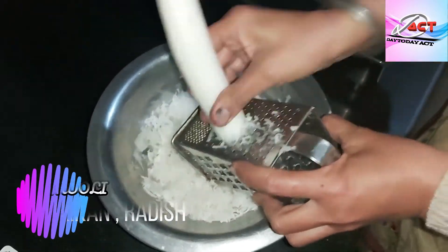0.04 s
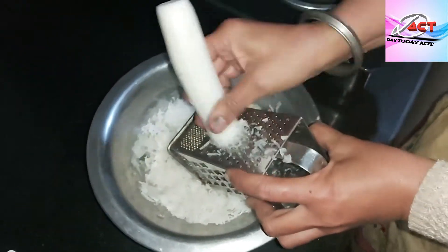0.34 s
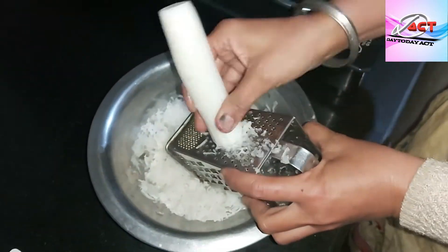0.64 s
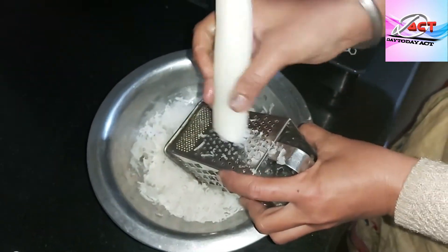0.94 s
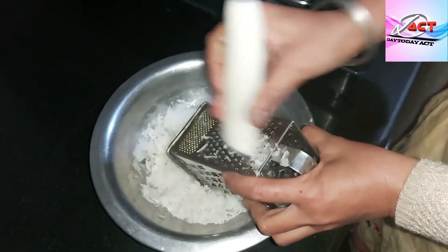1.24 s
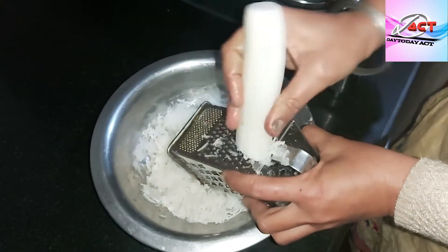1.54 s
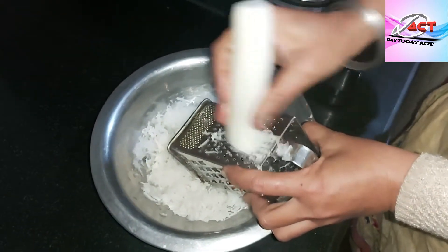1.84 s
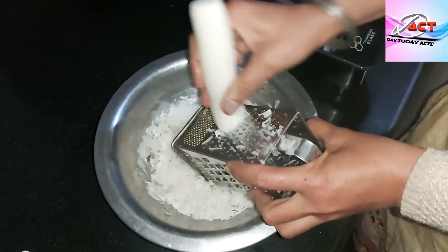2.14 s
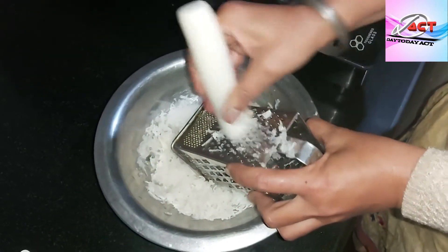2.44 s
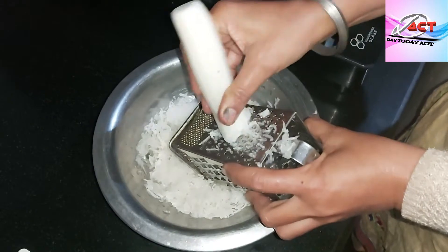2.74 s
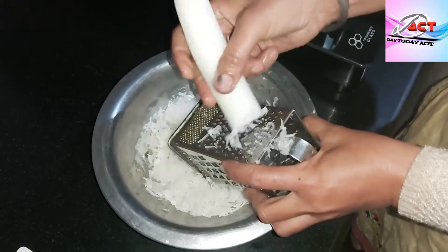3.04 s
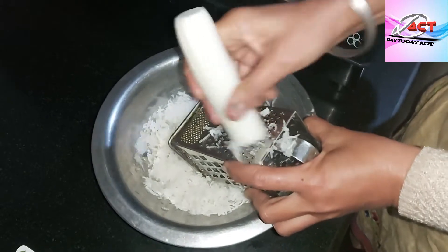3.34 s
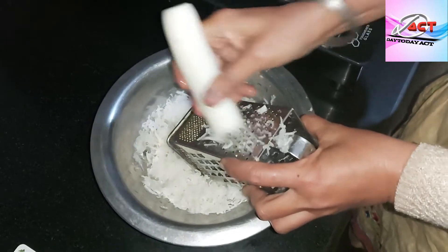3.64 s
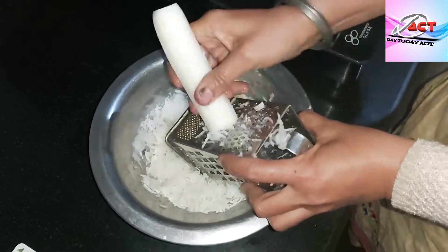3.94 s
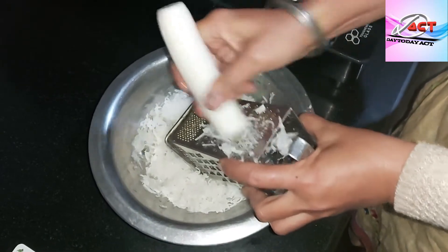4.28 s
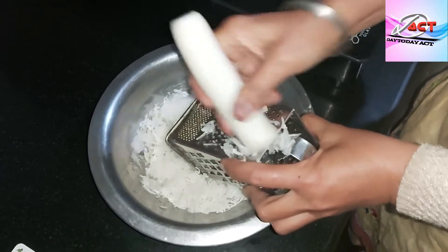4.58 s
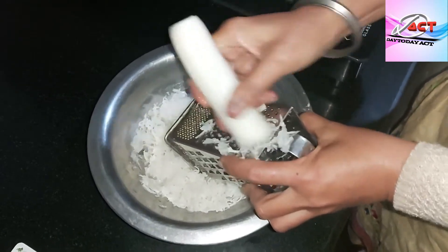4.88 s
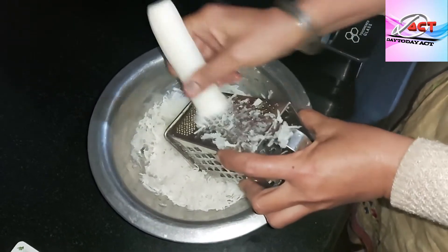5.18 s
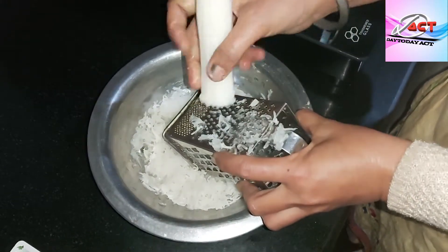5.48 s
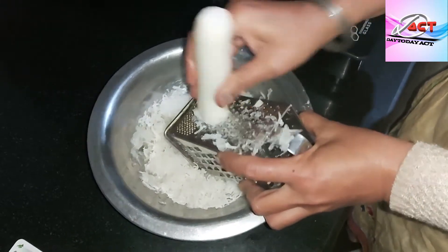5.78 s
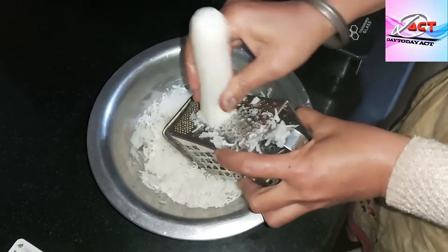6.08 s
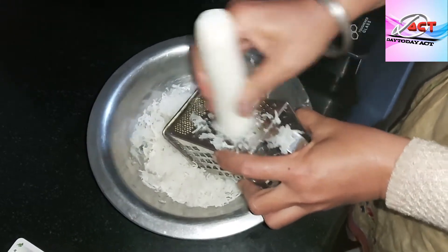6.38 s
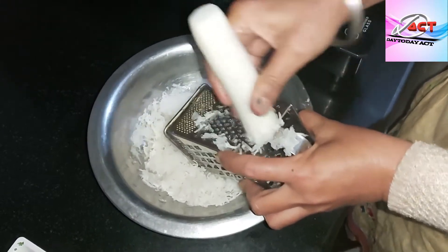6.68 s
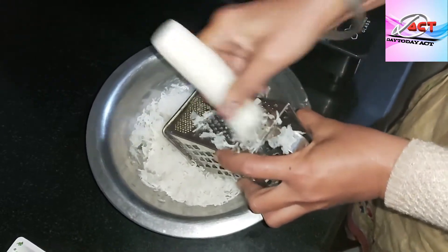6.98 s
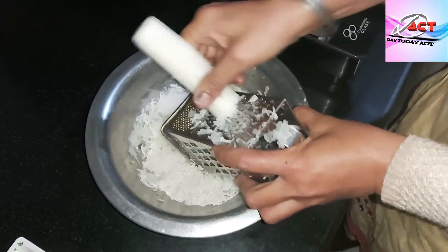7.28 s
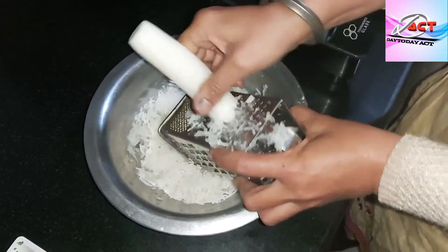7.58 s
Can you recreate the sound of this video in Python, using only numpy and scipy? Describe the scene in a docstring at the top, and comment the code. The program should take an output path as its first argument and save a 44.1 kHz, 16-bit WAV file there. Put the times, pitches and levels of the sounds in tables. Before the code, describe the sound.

A radish is grated on a steel box grater in a steel bowl, heard close in a small, hard-walled kitchen. Each push is a short, wet, hissing rasp with a crisp snap and a thin metallic ring, about four a second, with softer return scrapes between. The first run lasts until about 0.6 seconds. After a pause, the second starts softly at 1.1 seconds and builds until 2.7. A third runs from 3.4 to 5.2 seconds, and the last begins gently at 5.8 and grows stronger up to the end at 7.6. During the runs the grater rocks against the bowl in light, irregular metallic knocks, clearest around 2 to 2.5, 4 to 5 and 6.5 to 7.5 seconds. The worktop rumbles and thumps dully under the strokes, and the radish occasionally gives a faint, brief groan of friction. A quiet low hum lies underneath.

```python
"""Grating a radish

A radish is rubbed on a steel box grater in a steel bowl, in four runs of quick strokes. Each push
tears wet fibres, whose tiny impulses add up to a rasp and ring the sheet and its teeth; each pull
rasps more softly. The grater rocks and knocks on the bowl, the worktop rumbles under the strokes,
and a small hard kitchen with a low hum reverberates."""
import sys
import numpy as np
from scipy import signal
from scipy.fft import rfft, irfft, next_fast_len
from scipy.io import wavfile
from scipy.ndimage import uniform_filter1d

SR = 44100
rng = np.random.default_rng(int(sys.argv[2]) if len(sys.argv) > 2 else 0)


def output_pcm(signal):
    """Save a mono or channel-first signal as 16-bit PCM at the path in sys.argv[1].

    Samples are clipped to [-1, 1] before scaling.
    """
    pcm = np.clip(np.atleast_2d(signal).T, -1, 1) * 32767
    wavfile.write(sys.argv[1], SR, np.round(pcm).astype(np.int16))


N = 336042

# Strokes down the teeth and back up. Each row: start and end in seconds, rasp level in dB.
PUSHES = [(0.025, .106, -28), (0.288, .373, -28), (0.555, .619, -27), (1.152, 1.227, -34.5),
          (1.41, 1.482, -32), (1.656, 1.731, -31), (1.903, 1.967, -30.5), (2.145, 2.214, -28),
          (2.388, 2.463, -29), (2.642, 2.705, -27), (3.407, 3.467, -30.5), (3.671, 3.732, -28),
          (3.923, 3.996, -28), (4.167, 4.238, -26.5), (4.416, 4.496, -28.5), (4.668, 4.741, -29),
          (4.915, 4.979, -28), (5.162, 5.243, -26.5), (5.793, 5.846, -35), (6.034, 6.097, -32.5),
          (6.296, 6.361, -31), (6.536, 6.612, -28), (6.798, 6.838, -26), (7.033, 7.106, -27),
          (7.275, 7.33, -25.5), (7.53, 7.59, -25)]
PULLS = [(.165, 0.234, -33), (0.429, 0.497, -33.5), (1.266, 1.351, -37.5), (1.54, 1.59, -33),
         (1.781, 1.849, -33.5), (2.032, 2.097, -35.5), (2.279, 2.345, -31.5), (2.52, 2.593, -31.5),
         (3.555, 3.599, -35.5), (3.801, 3.865, -31.5), (4.054, 4.12, -31.5), (4.31, 4.369, -34.5),
         (4.551, 4.625, -33), (4.813, 4.85, -28.5), (5.048, 5.098, -30.5), (5.902, 5.98, -38.5),
         (6.165, 6.23, -35.5), (6.421, 6.505, -35.5), (6.655, 6.757, -34.5), (6.921, 6.99, -36),
         (7.159, 7.215, -31.5), (7.405, 7.458, -33)]
# Runs of strokes, each on a fresh edge of the radish. Each row: start and end in seconds,
# spray offset in dB, spray loss in dB per second, tooth ring offset in dB, worktop shake in dB.
RUNS = [(-1.4, 0.8, 1, 3.5, -7, 2), (1.37, 3, 3, 3.5, -1.5, 1), (3.5, 5.25, 2, 2.2, 2, -0.5),
        (5.5, 7.62, 5.5, 3.5, -2.5, -2)]
# Modes of the grater in the bowl, and of its sheet with the radish pressed on it.
# Each row: frequency in Hz, bandwidth in Hz, relative level in dB.
GRATER_MODES = [(302, 44, -4), (536, 45, -6), (762, 91, -3.5), (992, 56, -5.5), (1229, 54, -2),
                (1433, 93, -7.5), (1632, 31, -3.5), (1784, 36, -5.5), (1942, 102, -6), (2297, 60, -5.5),
                (3900, 410, -26)]
PRESSED_MODES = [(249, 145, -3.5), (525, 112, 0), (845, 167, 2), (1412, 187, 2), (1733, 135, 1.5),
                 (1986, 106, 4), (2303, 220, -5.5)]
# Spectra of tearing flesh and of fine spray. Each row: frequency in Hz, relative level in dB.
RASP_SPECTRUM = [(300, -38), (1200, -38), (2300, -4), (3000, -1), (4200, 0), (5800, -3), (6700, 0),
                 (7700, 2), (8700, -2.5), (9800, -6), (11500, -13.5), (16000, -30)]
SPRAY_SPECTRUM = [(6000, -46), (9000, -8.5), (10300, -2.5), (12000, -3), (14500, 0), (16000, -4.5)]
TOOTH_HZ = 7970  # ring of the teeth under a fresh edge


def pushes():
    """Forced vibration: the cutting strokes tear densely and drive a sheet damped by the radish."""
    fibres = tearing(per_second=5000, scatter_db=2, clump_db=1)
    return grating(PUSHES, fibres, PRESSED_MODES, rise_s=0.013, fall_s=0.012, arch_db=-1,
                   rasp_db=0.63, ring_db=-3, spray_db=1.44, tooth_db=2, flat_hz=0)


def pulls():
    """Lighter damping: on the return strokes the catches are sparser and the sheet rings more freely."""
    fibres = tearing(per_second=4500, scatter_db=3.5, clump_db=2.5)
    return grating(PULLS, fibres, GRATER_MODES, rise_s=0.011, fall_s=0.02, arch_db=-0.5,
                   rasp_db=0, ring_db=-2, spray_db=-2, tooth_db=-1.5, flat_hz=220)


def grating(strokes, fibres, modes, rise_s, fall_s, arch_db,
            rasp_db, ring_db, spray_db, tooth_db, flat_hz):
    """Source and filter: tearing fibres hiss, throw a fine spray and ring the sheet and its teeth."""
    start, end, level = np.transpose(strokes)
    spray, tooth, tooth_hz, _ = wear(strokes)
    force = lambda db: pressure(strokes, level + db, rise_s, fall_s, arch_db)
    clogged = start + 0.7 * (end - start)  # the teeth ring until pulp clogs them
    plucking = pressure(zip(start, clogged), level + tooth + tooth_db, rise_s, fall_s, arch_db)
    fibres = sliding(fibres)
    return (spread(fibres * force(rasp_db), colour(RASP_SPECTRUM))
            + spread(fibres * force(spray + spray_db), colour(SPRAY_SPECTRUM))
            + spread(fibres * force(ring_db), resonator(modes))
            + teeth(strokes, tooth_hz - flat_hz) * plucking)


def tearing(per_second, scatter_db, clump_db):
    """Shot noise: tiny ruptures come at random times and swell in clumps as rows of teeth bite."""
    breaks = rng.random((2, N)) < per_second / SR
    signs = np.sign(noise())
    sizes = amp(scatter_db * np.clip(noise(), -2, 2))
    return unit(breaks * signs * sizes * amp(clump_db * wobble(260)))


def sliding(fibres, patchy_db=2):
    """Time-varying filtering: the sliding radish covers changing holes, so the colour comes in patches."""
    spectra = signal.stft(fibres, nperseg=512)[2]
    patches = rng.standard_normal(spectra.shape[1:])
    for axis in (0, 1):  # smooth over frequency, then time
        patches = uniform_filter1d(patches, size=7, axis=axis)
    return unit(signal.istft(spectra * amp(patchy_db * unit(patches)), nperseg=512)[1][:, :N])


def teeth(strokes, strokes_hz, width_hz=1100, flutter_db=6.5):
    """Narrow-band resonance: plucked teeth sing around each stroke's pitch."""
    middles = np.mean(np.array(strokes)[:, :2], axis=1)
    pitch = np.interp(np.arange(N) / SR, middles, strokes_hz) * (1 + .028 * wobble(45))
    phase = 2 * np.pi * np.cumsum(pitch) / SR
    band = filtered(rng.standard_normal((2, 2, N)), lambda hz: 1 / (1 + (2 * hz / width_hz) ** 2))
    ring = band[0] * np.cos(phase) + band[1] * np.sin(phase)
    return unit(ring * amp(flutter_db * wobble(70)))


def pressure(strokes, levels_db, rise_s, fall_s, arch_db):
    """Amplitude envelope: a stroke bites and lets go; arch_db is its fast middle relative to its ends."""
    t, force = np.arange(N) / SR, np.zeros(N)
    for (start, end, *_), db in zip(strokes, levels_db):
        near = slice(max(int((start - .1) * SR), 0), int((end + .2) * SR))
        u = t[near]
        gate = (1 + np.tanh((u - start) / rise_s)) * (1 + np.tanh((end - u) / fall_s)) / 4
        speed = np.sin(np.pi * np.clip((u - start) / (end - start), 0, 1))
        force[near] += gate * amp(db + arch_db * (speed - 1))
    return force


def wear(strokes, sag_hz_per_s=220, loss_db_per_s=4.5):
    """Loading: as the radish's edge wears flat it covers more teeth, which ring lower and softer."""
    starts, runs = np.array(strokes)[:, 0], np.array(RUNS)
    began, _, spray_db, spray_loss, tooth_db, shake_db = runs[np.searchsorted(runs[1:, 0], starts)].T
    age = starts - began
    tooth_hz = TOOTH_HZ - sag_hz_per_s * age
    return spray_db - spray_loss * age, tooth_db - loss_db_per_s * age, tooth_hz, shake_db


def knocks(half_band_octaves=0.43, crack_db=-18, rattle=0.081):
    """Impact excitation: the rim lands, chatters and bounces; the contact point favours certain modes."""
    # The grater rocks against the bowl. Each row: time in seconds, relative level in dB, centre in Hz.
    landings = [(.282, -13.5, 1470), (.528, -13, 1440), (1.319, -21, 1230), (1.557, -12.5, 1140),
                (1.813, -17.5, 1220), (2.051, -14.5, 1220), (2.119, -11.5, 1500), (2.302, -10.5, 1350),
                (2.543, -11.5, 1230), (3.063, -44.5, 1790), (3.443, -19, 1244), (3.462, -18.5, 2030),
                (3.847, -20.5, 1238), (4.074, -15, 1230), (4.14, -14.5, 1440), (4.33, -15.5, 1254),
                (4.388, -18, 1400), (4.585, -15, 1260), (4.606, -18, 1450), (4.825, -13, 1200),
                (4.883, -13, 1440), (5.062, -9, 1310), (5.089, -14.5, 1430), (6.483, -15.5, 1320),
                (6.737, -11, 1370), (6.975, -9.3, 1680), (7.199, -21.5, 1274), (7.466, -12, 1350)]
    blows, cracks = np.zeros((2, 2, N + SR))
    t = np.arange(SR // 20) / SR
    for s, db, centre_hz in landings:
        chatter = rattle * noise(len(t)) * amp(-60 * t / 0.045)
        bounce = amp(0.5 - 10.5 * np.log2(centre_hz / 1264))  # weaker for a brighter contact
        chatter[:, 0] += [1, .5 * rng.choice([-1, 1])]
        bounce_at = int(rng.uniform(.004, .0056) * SR)
        chatter[:, bounce_at] += bounce * np.array([1, .5 * rng.choice([-1, 1])])
        edges_hz = centre_hz * 2 ** (half_band_octaves * np.array([-1, 1]))
        contact = signal.butter(1, edges_hz, "bandpass", fs=SR)
        add_at(blows, s, amp(db + 16.5) * signal.lfilter(*contact, chatter))
        add_at(cracks, s, amp(db + crack_db) * chatter)
    return spread(blows, resonator(GRATER_MODES)) + spread(cracks, colour(RASP_SPECTRUM))


def snaps(t60_s=0.041):
    """Stress release: a thick fibre gives way in a crackle that plucks a tooth and stirs the sheet."""
    # Fibres snap and wet shreds drop. Each row: time in seconds, relative level in dB.
    breaks = [(1.068, -30.5), (1.1216, -38), (1.1613, -14), (2.1201, -15), (2.6474, -9), (3.2824, -44),
              (3.3463, -44), (3.3819, -20), (3.411, -14), (3.437, -11), (3.6676, -18), (3.8052, -13.5),
              (4.1692, -8), (4.6683, -14), (5.67, -44), (6.2854, -20), (6.789, -15), (6.7995, -11),
              (7.1718, -13), (7.2832, -11), (7.5133, -10.5)]
    bites = [(start, db) for start, _, db in PUSHES]  # every push begins with a snap
    cracks, t = np.zeros((2, N + SR)), np.arange(SR // 8) / SR
    for s, db in list(breaks) + bites:
        add_at(cracks, s, amp(db - 14.5 - 60 * t / t60_s) * noise(len(t)))
    parts = [(-2, colour(RASP_SPECTRUM)), (-3, colour(SPRAY_SPECTRUM)),
             (-9, resonator(PRESSED_MODES)), (-4, resonator([(TOOTH_HZ, 700, 0)]))]
    return spread(cracks, lambda hz: sum(amp(db) * part(hz) for db, part in parts))


def groans(width_hz=70):
    """Stick-slip friction: juddering flesh drives one resonance of the sheet in a short dull groan."""
    # Each row: start and end in seconds, resonance in Hz, level in dB.
    judders = [(0.554, 0.61, 255, -33.5), (0.61, 0.65, 940, -36), (1.778, 1.864, 500, -40),
               (3.407, 3.495, 540, -40), (4.63, 4.684, 245, -39.5), (5.202, 5.223, 914, -38),
               (5.892, 5.98, 560, -42)]
    out = np.zeros((2, N))
    for start, end, hz, db in judders:
        ring = unit(spread(noise(), resonator([(hz, width_hz, 0)])))
        out += ring * pressure([(start, end)], [db], rise_s=0.0087, fall_s=0.0097, arch_db=7)
    return out


def rumble(push_db=-14, pull_db=-11, lag_s=0.019):
    """Structure-borne sound: the strokes shake bowl and worktop, the more the harder they are."""
    # Spectrum of the worktop. Each row: frequency in Hz, relative level in dB.
    worktop = [(30, -46), (60, -22.5), (85, 3), (105, -4), (130, -12), (180, -5.5), (280, -15.5),
               (450, -29), (1000, -66)]
    strokes = np.vstack([PUSHES, PULLS])
    *_, shake_db = wear(strokes)
    levels = strokes[:, 2] + shake_db + np.repeat([push_db, pull_db], [len(PUSHES), len(PULLS)])
    force = pressure(strokes, levels, rise_s=0.028, fall_s=0.037, arch_db=-8)
    lagged = np.pad(force, (int(lag_s * SR), 0))[:N]
    return lagged * spread(noise(), colour(worktop))


def thumps(mode_hz=85, t60_s=0.32, attack_s=0.016, lead_s=0.03035):
    """Damped oscillation: the turning hand shoves the bowl, and the worktop booms at its lowest mode."""
    # Heavier shoves. Each row: time in seconds, relative level in dB.
    shoves = [(.351, -29.5), (.45, -29), (2.331, -30), (3.92, -32.5), (4.74, -32.5), (7.471, -35)]
    strokes = np.vstack([PUSHES, PULLS])
    _, ends, rasp_db = strokes.T
    *_, shake_db = wear(strokes)
    # A stroke at the end of its run lifts off and shoves less.
    lifts = abs(ends[:, None] - np.array(RUNS)[:, 1]).min(axis=1) < .1
    effort_db = rasp_db - rasp_db.mean()
    levels = rasp_db.mean() - 8.5 + 1.2 * effort_db + shake_db - 14 * lifts
    boom, t = np.zeros(N + SR), np.arange(SR // 3) / SR
    for s, db in list(zip(ends - lead_s, levels)) + list(shoves):
        hz = mode_hz * (1 + 0.064 * rng.standard_normal())
        envelope = amp(db + 6.5 - 60 * t / t60_s) * (1 - np.exp(-t / attack_s))
        add_at(boom, s, envelope * np.sin(2 * np.pi * hz * t))
    return boom[:N]


def kitchen(x, wet_db, delay_s=.004):
    """Reverberation: hard walls return a diffuse tail in which each frequency dies at its own rate."""
    # Each row: frequency in Hz, time to decay by 60 dB in seconds.
    decay_times = [(100, 0.38), (500, 0.61), (2000, 0.5), (7000, 0.43), (11000, 0.26), (15000, 0.37)]
    hz, t, spectra = signal.stft(noise(SR * 3 // 4), SR, nperseg=256)
    decay = amp(-60 * t / along(decay_times, hz)[:, None])
    tail = signal.istft(spectra * decay, SR, nperseg=256)[1]
    tail = np.pad(tail / np.linalg.norm(tail[0]), ((0, 0), (int(delay_s * SR), 0)))
    return x + amp(wet_db) * signal.fftconvolve(x, tail, axes=1)[:, :N]


def background(mains_hz=50, hum_db=-48.5, dip_db=8.5):
    """Noise floor: room air, a far motor that fades away, and mains hum that sinks in the pauses."""
    # Air noise, motor noise and motor tones. Each row: frequency in Hz, relative level in dB.
    air_spectrum = [(20, -22), (35, -22), (58, -6), (100, -10), (130, -15.5), (175, -5), (225, -34.5),
                    (263, -13.5), (350, -27.5), (530, -22.5), (1070, -34.5), (1900, -27.5), (2800, -40.5),
                    (7400, -43), (16000, -57.5)]
    motor_spectrum = [(50, -38), (100, -9), (135, -7), (180, 2), (250, 0), (330, -6), (500, -10),
                      (1500, -24), (4000, -30.5), (16000, -42)]
    motor_tones = [(101, -5.5), (183, -5), (199, -16.5), (248, -3), (300, -16)]
    # The motor's fading. Each row: time in seconds, gain in dB.
    motor_fade = [(0, -47.5), (1.1, -49.5), (2.2, -47), (2.9, -61.5), (7.6, -68)]
    t = np.arange(N) / SR

    def tone(hz, waver_rad):
        """Random modulation: a sine wavers in level and phase."""
        return amp(1.1 * wobble(2.2)) * np.sqrt(2) * np.sin(2 * np.pi * hz * t + waver_rad * wobble(9))

    air = amp(-52) * spread(noise(), colour(air_spectrum))
    motor = spread(noise(), colour(motor_spectrum))
    motor += sum(amp(db) * tone(hz, waver_rad=0.89) for hz, db in motor_tones)
    motor *= amp(np.interp(t, *np.transpose(motor_fade)))
    in_run = sum(1. * ((t >= start) & (t < end)) for start, end, *_ in RUNS)
    pause = 1 - uniform_filter1d(in_run, size=SR // 5)
    return air + motor + amp(hum_db - dip_db * pause) * tone(mains_hz, waver_rad=.1)


def spread(pair, response, lead_s=.00019):
    """Coherence: two signals become left and right, alike in the bass, apart in the treble, left first."""
    # Each row: frequency in Hz, correlation of left and right.
    coherence = [(60, 0.96), (200, 1), (400, 0.89), (700, 0.58), (1300, 0.54), (2400, 0.02), (7000, 0.033),
                 (16000, 0.083)]
    angle = lambda hz: np.arccos(np.clip(along(coherence, hz), -1, 1)) / 2
    mid, side = filtered(pair, lambda hz: response(hz) * np.array([np.cos(angle(hz)), np.sin(angle(hz))]))
    return np.array([mid + side, np.roll(mid - side, round(lead_s * SR))])


def resonator(modes):
    """Modal superposition: resonances of alternating sign sum to a causal response of mean power 1."""
    def response(hz):
        total = sum((-1) ** k * amp(db) * 1j * hz * width / (centre ** 2 - hz ** 2 + 1j * hz * width)
                    for k, (centre, width, db) in enumerate(modes))
        return total / np.sqrt(np.mean(abs(total) ** 2))
    return response


def colour(points):
    """Spectral envelope: a response of mean power 1 shaped by (Hz, dB) points."""
    return lambda hz: unit(amp(along(points, hz)))


def filtered(x, response):
    """Linear filtering: the spectrum of x times a frequency response."""
    size = next_fast_len(N + SR // 2)
    return irfft(rfft(x, size) * response(np.fft.rfftfreq(size, 1 / SR)), size)[..., :N]


def along(points, hz):
    """Interpolation of (Hz, value) points on a logarithmic frequency axis."""
    points_hz, values = np.transpose(points)
    return np.interp(np.log(hz + 1), np.log(points_hz + 1), values)


def wobble(rate):
    """Low-pass noise: a curve through rate random knots a second."""
    knots = rng.standard_normal(int(N * rate / SR) + 2)
    return np.interp(np.arange(N) * rate / SR, np.arange(len(knots)), knots)


def noise(samples=N):
    """White noise in two independent channels."""
    return rng.standard_normal((2, samples))


def add_at(track, start_s, sound):
    """Superposition of a sound on a track, from start_s on."""
    track[..., round(start_s * SR):][..., :sound.shape[-1]] += sound


def amp(db):
    """Decibels to amplitude ratio."""
    return 10 ** (np.asarray(db) / 20)


def unit(x):
    """Normalisation to rms 1."""
    return x / np.sqrt(np.mean(x ** 2) + 1e-20)


def scene():
    """Superposition: grater, worktop and room add up, each band leaning to one side."""
    # Each row: frequency in Hz, level of left over right in dB.
    balance = [(60, 1.5), (110, 3), (200, -1), (380, -.5), (700, 2), (1400, 0), (2400, 8), (3300, 0),
               (4400, -2), (5700, -2.5), (7500, 1), (10000, 2), (12500, 1), (14500, -2.5)]
    scraping = kitchen(pushes() + pulls() + snaps() + groans(), wet_db=-6)
    knocking = kitchen(knocks(), wet_db=-6.5)
    sound = scraping + knocking + rumble() + thumps() + background()
    return filtered(sound, lambda hz: amp(np.outer([.5, -.5], along(balance, hz))))


def record(dry):
    """Band limiting: a steep low-pass removes the highest treble."""
    cutoff_hz = 15850
    return filtered(dry, lambda hz: 1 / (1 + (hz / cutoff_hz) ** 240))


dry = scene()
out = record(dry)
output_pcm(out)
```